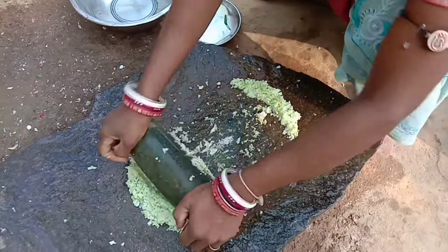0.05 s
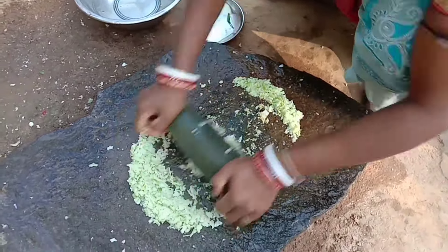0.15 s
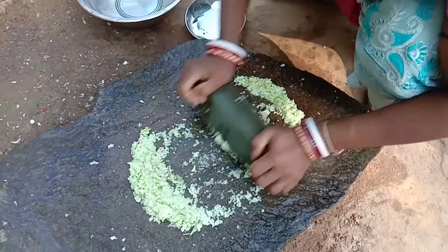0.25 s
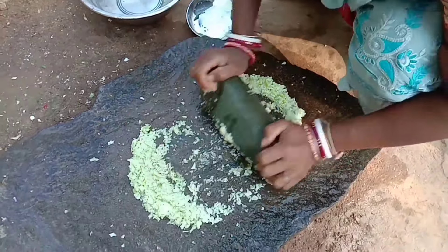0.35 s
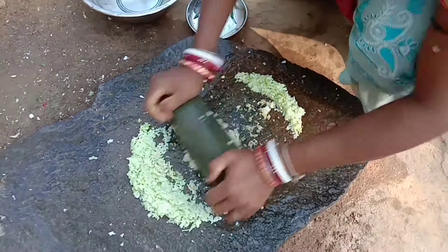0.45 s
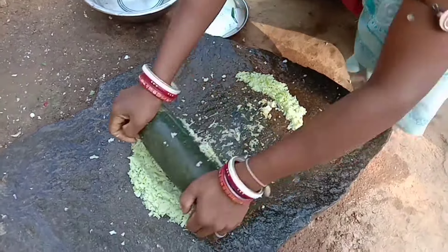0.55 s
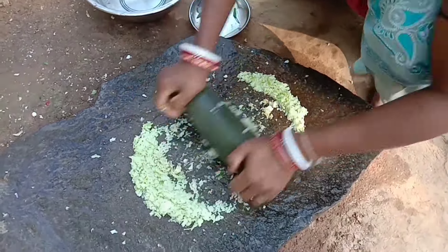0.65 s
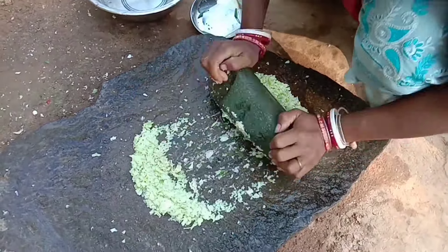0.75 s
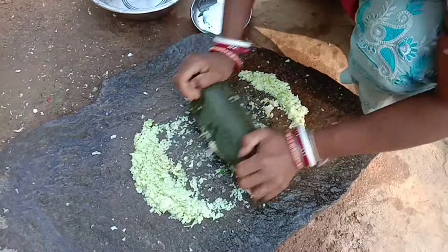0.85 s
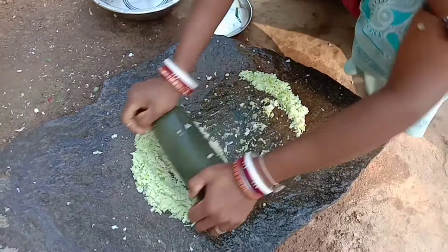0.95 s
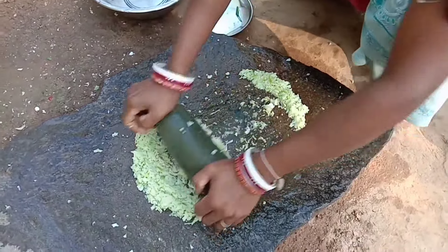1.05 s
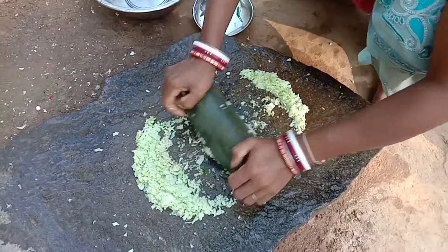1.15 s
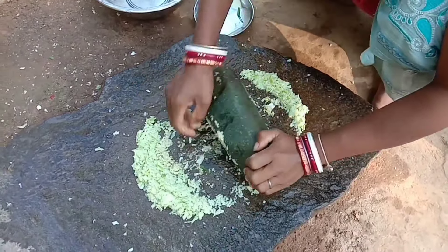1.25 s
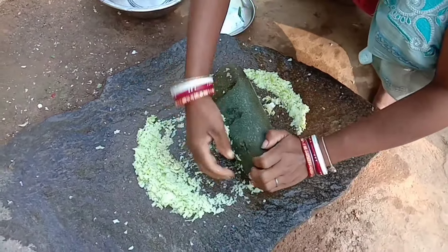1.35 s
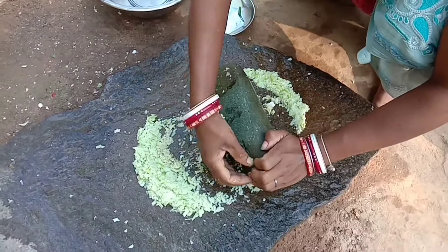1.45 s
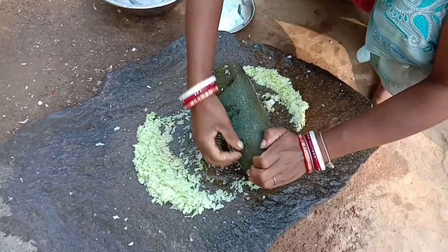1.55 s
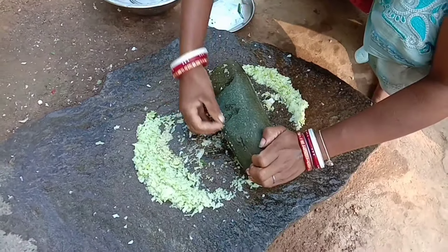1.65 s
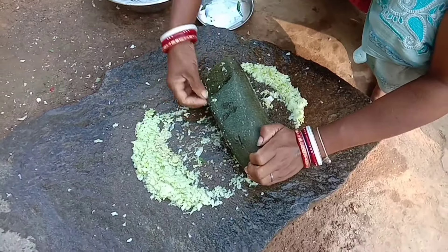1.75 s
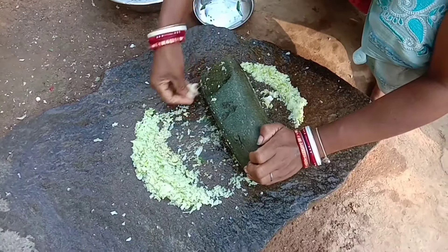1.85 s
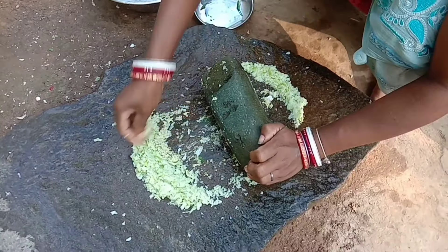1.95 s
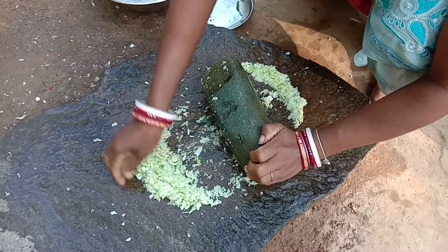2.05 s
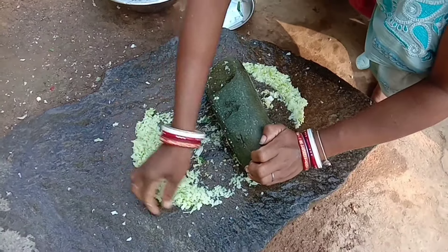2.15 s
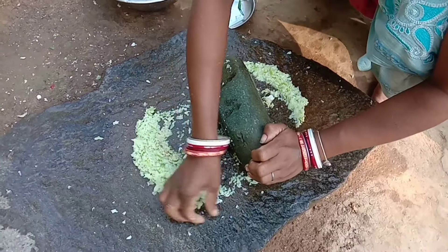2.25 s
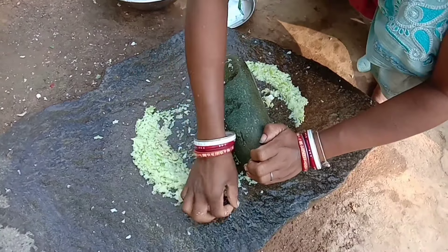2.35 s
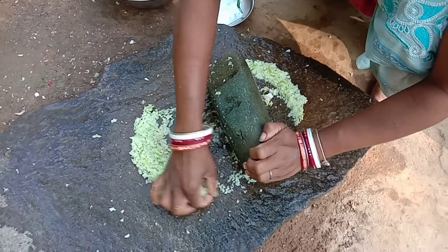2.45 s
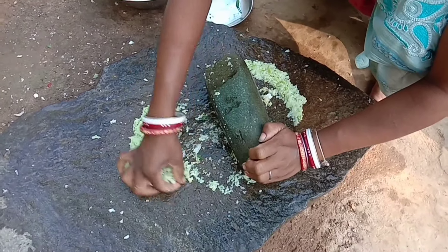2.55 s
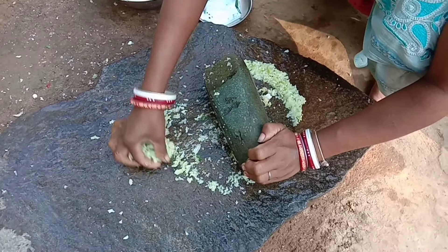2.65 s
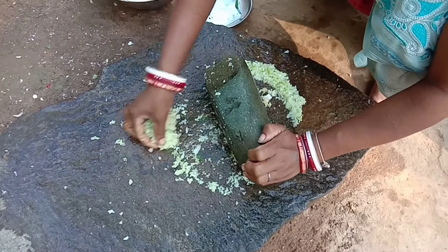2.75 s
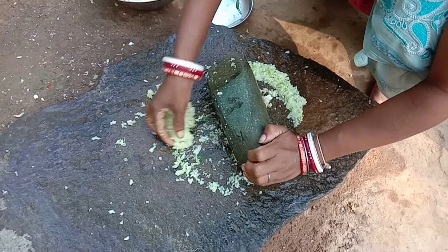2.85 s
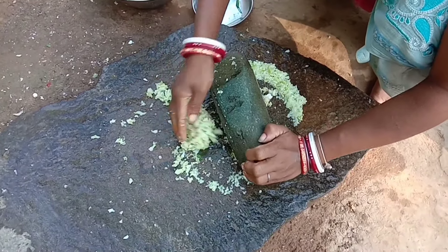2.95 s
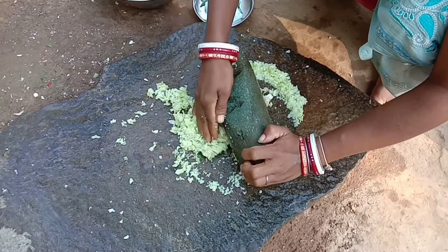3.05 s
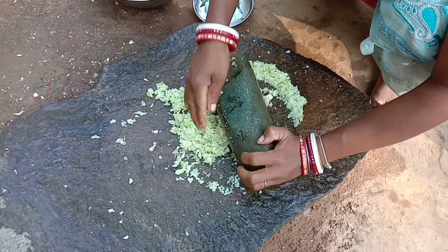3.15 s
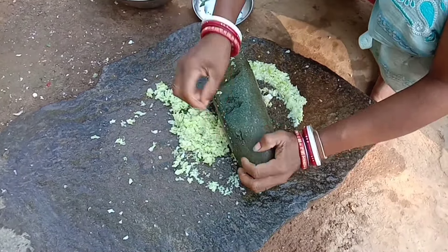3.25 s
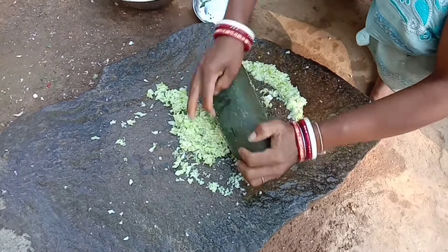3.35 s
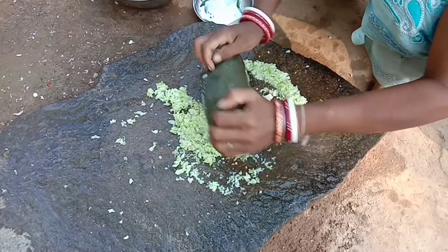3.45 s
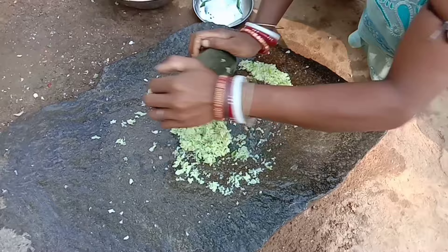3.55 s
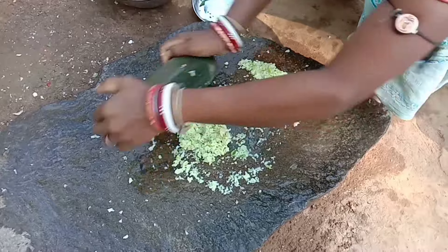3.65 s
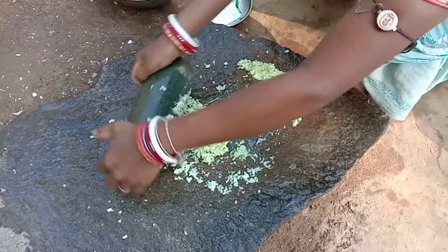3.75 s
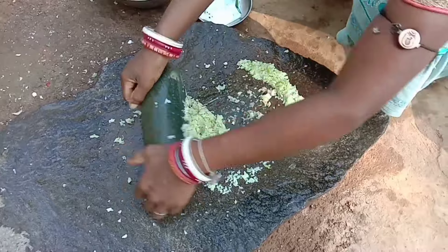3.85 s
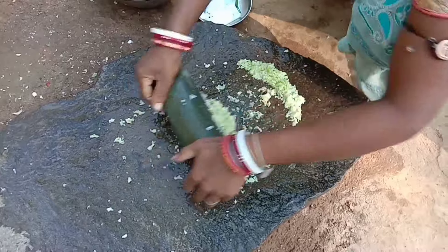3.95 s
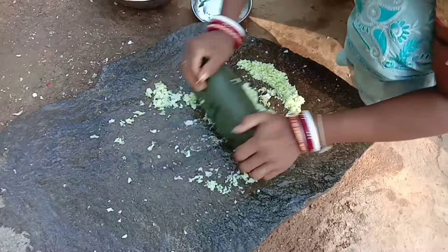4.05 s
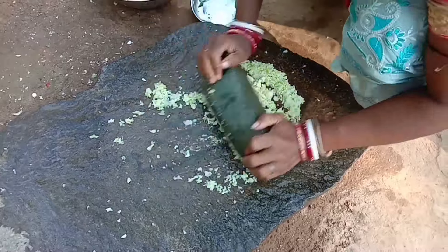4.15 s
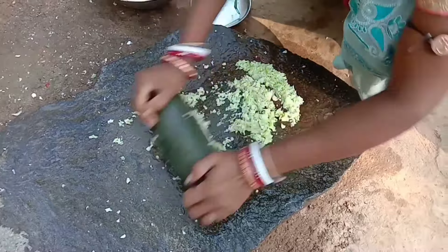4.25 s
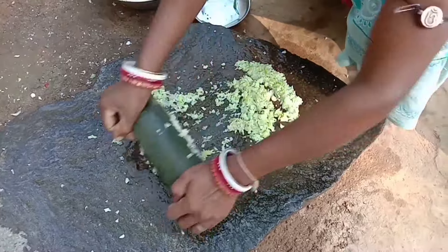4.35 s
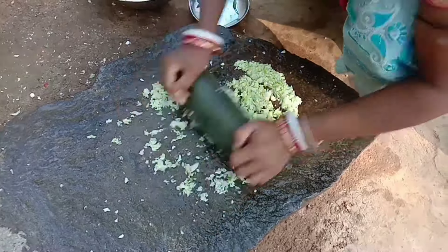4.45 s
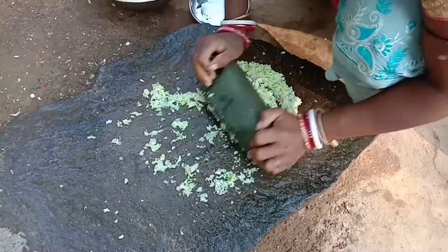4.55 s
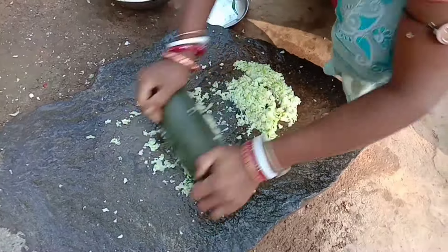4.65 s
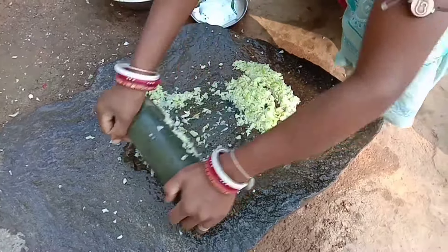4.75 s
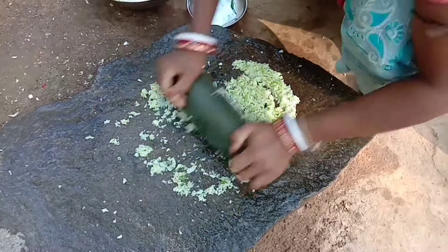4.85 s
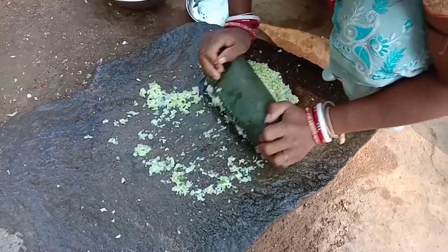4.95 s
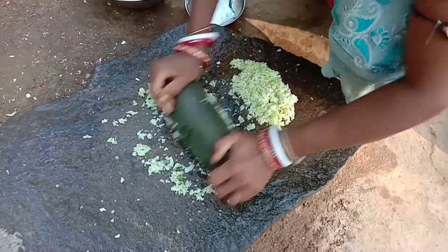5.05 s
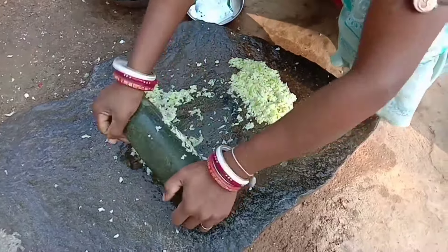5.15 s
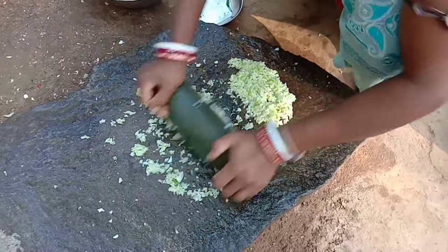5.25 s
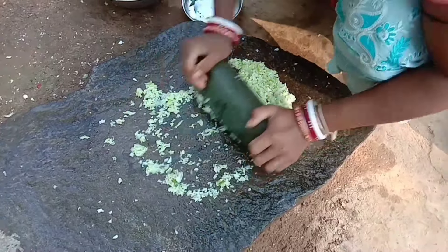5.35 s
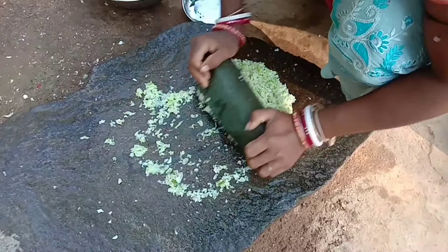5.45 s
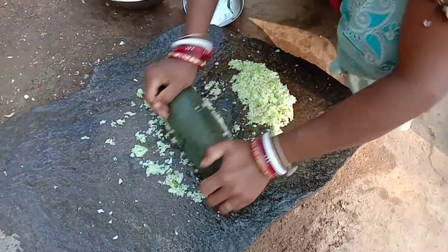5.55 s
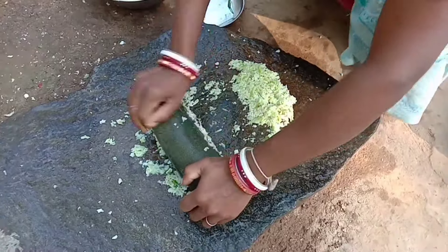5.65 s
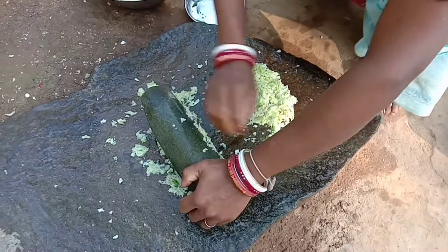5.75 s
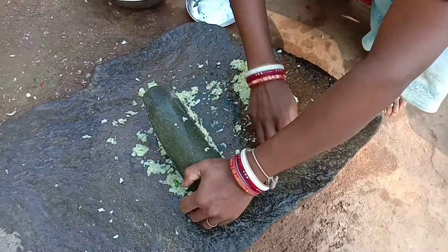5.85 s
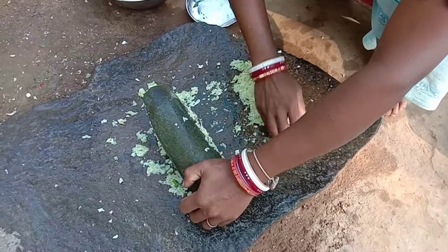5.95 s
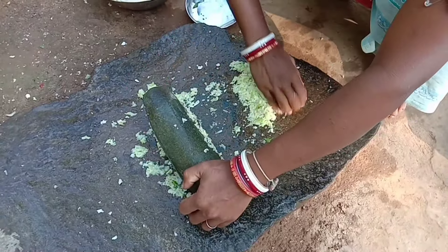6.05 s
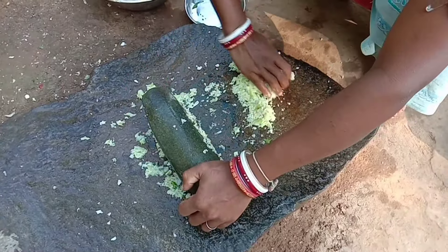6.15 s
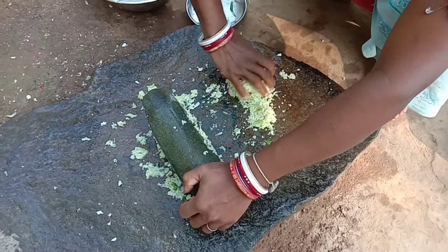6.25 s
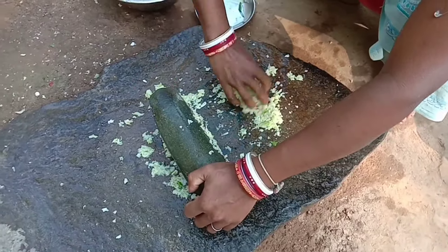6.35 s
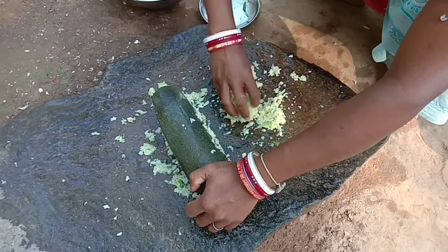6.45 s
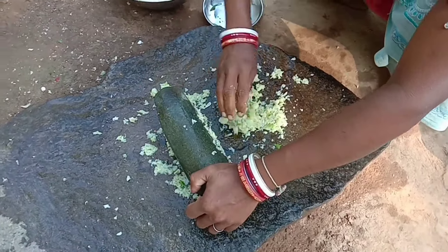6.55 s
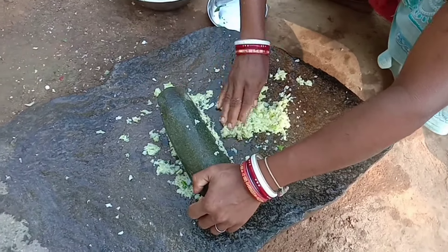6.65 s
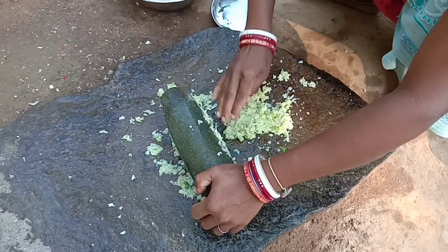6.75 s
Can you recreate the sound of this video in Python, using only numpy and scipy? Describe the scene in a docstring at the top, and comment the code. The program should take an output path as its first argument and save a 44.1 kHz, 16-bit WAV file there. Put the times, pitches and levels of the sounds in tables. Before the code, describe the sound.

A stone roller rumbles and scrapes wet shreds on a stone slab, bangles clinking, with a quieter hand-gathering pause and birdsong outdoors.

```python
"""Outdoors, beside a stone slab: from the start a stone roller rumbles, grit scrapes, wet pulp squishes, bangles clink.
From about 1.3 s the roller's strokes pause: a palm gathers the shreds, and birds whistle from the trees.
Between 3 and 4 s the roller is knocked down and goes back to work, now with less grit and more bursting bits.
From about 5.8 s the hand gathers again and birds call. One close phone microphone hears it all over the yard's hush.
Noise and random clicks, coloured or set ringing, make the work; sliding sines make the birds."""
import sys
import numpy as np
from scipy import signal
from scipy.fft import rfft, irfft, next_fast_len
from scipy.io import wavfile
from scipy.ndimage import uniform_filter1d

SR = 44100
rng = np.random.default_rng(int(sys.argv[2]) if len(sys.argv) > 2 else 0)


def inscribe(sig):
    """Save sig as 16-bit PCM at rate SR to the path in sys.argv[1].

    A 1-D sig is mono; a 2-D sig holds one channel per row.
    Samples are clipped to [-1, 1] before scaling.
    """
    pcm = np.round(np.clip(np.atleast_2d(sig).T, -1, 1) * 32767)
    wavfile.write(sys.argv[1], SR, pcm.astype(np.int16))


N = 299197

# Hush of the yard: (frequency [Hz], relative level per Hz [dB])
YARD_SPECTRUM = [(15, -32), (25, -18), (43, -14), (80, 2.5), (115, 7), (180, -1), (451, -14.5),
                 (1070, -18.5), (1260, -19), (1560, -20.5), (4370, -24), (5430, -24), (7920, -31.5),
                 (14800, -34), (16000, -29)]
YARD_DB = -45.5
# Part of the hush that differs between the channels: (frequency [Hz], relative level per Hz [dB])
SIDE_AIR_SPECTRUM = [(12, -72), (20, -42), (194, -21), (319, -23), (1050, -39), (1270, -61), (1730, -21),
                     (2690, -46), (15000, -52)]

# Roller strokes: (start [s], length [s], moment of hardest pressure [share of length],
# rumble [relative dB], grit [relative dB], pulp [relative dB], fizz [relative dB])
ROLLER_STROKES = [(-0.09, 0.27, 0, -18.5, -23, -29, -30.5), (0.171, 0.22, 0.26, -31, -33, -32, -36),
                  (0.378, 0.29, 0.11, -29, -29.5, -33, -37.5), (0.631, 0.2, .6, -37, -31, -31, -33.5),
                  (0.831, 0.26, 0.16, -41, -28, -31, -35), (1.07, 0.21, 0.5, -30.5, -35, -32.5, -37),
                  (3.609, 0.28, 0.19, -35, -37, -37, -42), (3.935, 0.32, 0, -59, -49.5, -40.5, -62),
                  (4.189, 0.33, 0.15, -43, -49, -35.5, -44.5), (4.421, 0.24, 0.3, -47, -50, -34, -46.5),
                  (4.621, 0.29, 0.12, -43, -47.5, -36, -38), (4.838, 0.19, 0.77, -38, -38.5, -31, -39),
                  (5.014, 0.3, 0.18, -36, -43, -34.5, -41), (5.271, 0.22, 0.52, -28.5, -41, -33.5, -39.5),
                  (5.443, 0.31, 0.28, -31.5, -39.5, -36, -43)]
STROKE_RISE_S, STROKE_FALL_S = 0.057, 0.11   # the roller gathers speed, then slows
PRESSURE_POWER = 1.86   # how closely grit and rumble gather round the hardest pressure
# Roller lurching over a lump or rocking at rest: (time [s], relative level [dB])
ROLLER_LURCHES = [(0.026, -13.5), (0.315, -18), (0.465, -29.5), (0.58, -33), (0.679, -21.5), (0.783, -28),
                  (0.982, -25), (1.255, -34), (1.41, -44), (1.7, -40), (2.01, -38.5), (2.085, -34.5),
                  (2.55, -39), (2.73, -47), (3.04, -43), (3.14, -54), (3.25, -38), (3.35, -39.5),
                  (3.65, -29), (3.695, -21.5), (4.297, -27.5), (4.471, -30), (4.545, -33), (4.707, -24),
                  (4.78, -30.5), (4.89, -21.5), (4.975, -28), (5.165, -28.5), (5.585, -30), (6.365, -44),
                  (6.44, -39), (6.53, -35)]
LURCH_S = 0.018   # standard deviation of a lurch's bell shape
# Spectra at the slab: (frequency [Hz], relative level per Hz [dB])
RUMBLE_SPECTRUM = [(25, -36), (50, -36), (75, -12), (100, 2.5), (125, 8.5), (160, 5.5), (200, -12),
                   (260, -16.5), (400, -64)]
GRIT_SPECTRUM = [(150, 7), (260, -0.5), (450, 3.5), (700, 6.5), (870, 6), (1040, 0.5), (1250, -5.5),
                 (1470, -4), (1850, 9.5), (2130, 1), (2450, 4), (3500, -36)]
PULP_SPECTRUM = [(600, -21), (1200, -13.5), (2400, -7), (3500, 0.5), (4700, -0.5), (5700, 3), (6600, 1.5),
                 (7300, -9.5), (8000, -13), (10000, -14.5), (16000, -81)]
FIZZ_SPECTRUM = [(6000, 1), (7200, 17), (8100, -20), (10000, 8.5), (11400, -35), (12500, -20), (15000, 8),
                 (16000, -3)]

# Roller knocking on the slab: (time [s], relative level [dB], contact hardness [Hz], relative ring level [dB])
ROLLER_KNOCKS = [(0.002, -12, 706, -8), (3.01, -26, 660, -2), (3.503, -16.5, 531, -5),
                 (3.55, -21, 485, -4.5), (3.635, -17.5, 610, 33), (3.670, -24.5, 720, 8),
                 (3.715, -1, 836, -10.5), (3.7371, -18, 640, 0), (3.8778, -2.5, 994, -4.5),
                 (3.8792, -9.5, 1710, 7), (3.8831, -8, 454, 0), (3.897, -6, 684, -18),
                 (5.586, -13, 338, -15), (5.598, -15.5, 310, -1.5), (6.364, -14.5, 250, -23)]
# Ringing modes of roller and slab: (frequency [Hz], relative level [dB], 60 dB decay time [s])
STONE_MODES = [(139.6, -7, 0.093), (250, -50, 0.026), (426, -1.5, 0.025), (525, -5, 0.036),
               (691, -8, 0.063), (738, -28, 0.03), (900, -6, 0.044), (1272, -3.5, 0.018),
               (1640, -33, 0.087), (1815, -4, 0.082), (2094, 0.5, 0.066)]

# Bangles touching: (time [s], relative level [dB], brightness [Hz], relative sparkle above 8 kHz [dB])
BANGLE_TOUCHES = [(0.0333, -7, 5500, -20), (0.075, 5.5, 13500, -18), (0.0828, 1, 5700, -6),
                  (0.113, -2.5, 6550, -16), (0.127, -0.5, 3480, -12.5), (0.139, -4, 5840, -20),
                  (0.174, -14.5, 5100, -25), (0.3379, -6, 3460, -11.5), (0.5214, 4, 5770, -15.5),
                  (0.556, -4.5, 5900, -14), (0.58, -4.5, 6400, -16.5), (0.617, -13, 6900, -16),
                  (0.7793, -8.5, 3370, -13.5), (0.7962, -8.5, 6450, -15), (0.889, -9.5, 6640, -10),
                  (0.973, -2, 13500, -13.5), (0.9951, -2, 6230, -19), (1.0146, -4.5, 8700, -10),
                  (1.0423, -7.5, 6540, -26), (1.065, -10.5, 6150, -18), (1.3546, -21, 4160, -27),
                  (1.4282, -8, 11700, -12.5), (1.45, -11.5, 5300, -19), (2.056, -19.5, 4720, -36),
                  (2.0754, -23.5, 4720, -31), (2.4229, -25.5, 7000, -20), (2.561, -18, 5000, -22),
                  (2.7418, -26, 15100, -19), (3.141, -27, 5700, -20), (3.3147, -5.5, 4710, -18.5),
                  (3.3656, -18, 4650, -21), (3.5745, -18, 3470, -18.5), (3.641, -11.5, 7250, -26),
                  (3.6696, -7.5, 7260, -21), (3.6887, -10, 9700, -10), (3.709, -6, 6700, -22),
                  (3.7427, -7.5, 7200, -24), (3.7825, -7.5, 7300, -17), (3.8087, -11.5, 7400, -22),
                  (3.934, -12, 6210, -22), (4.1361, -7.5, 9800, -9.5), (4.156, -10, 6300, -19),
                  (4.348, -6, 6100, -16.5), (4.3802, -2, 7300, -16), (4.4002, 0, 6600, -17.5),
                  (4.4315, -12, 6620, -19), (4.5775, -5.5, 6480, -18.5), (4.7586, -5.5, 6670, -15),
                  (4.78, 0.5, 4730, -15.5), (4.801, 0, 5700, -19), (4.8135, -6, 5500, -22),
                  (4.8797, -5.5, 5700, -18.5), (4.997, -12.5, 5170, -15), (5.117, -9.5, 6800, -15.5),
                  (5.1952, -0.5, 6800, -20), (5.2103, -0.5, 7280, -12), (5.217, -1.5, 7300, -18),
                  (5.242, -2, 7400, -18), (5.2594, -10.5, 5870, -21), (5.5423, -13.5, 6640, -15),
                  (5.6335, -3, 4700, -17.5), (5.6636, -16, 10300, -8), (5.696, -7.5, 11500, -10),
                  (5.717, -12.5, 7200, -21), (5.808, -20.5, 4550, -43), (5.891, -6, 6500, -13.5),
                  (6.339, -12.5, 5100, -23), (6.698, -15.5, 3730, -29)]
# Ringing modes of the bangles: (nominal frequency [Hz], relative level [dB], 60 dB decay time [s])
BANGLE_MODES = [(3460, -13, 0.067), (4040, -26, 0.15), (4720, -4, 0.015), (5300, 1, 0.0073),
                (5700, 2, 0.0078), (6480, 4.5, 0.0073), (6980, -0.5, 0.0045), (7260, -7, 0.053),
                (8820, -11, 0.025), (9926, -0.5, 0.0063), (11320, -12, 0.041), (13400, -37, .07),
                (13500, -6.5, 0.011), (14100, -27, .02), (15000, -25, .02)]
CHATTER_S = 0.0056   # decay of the bounces after a touch
JOSTLE_S = 0.013   # decay of the shaking that a touch gives the other bangles

# Bits of vegetable bursting: (time [s], relative level [dB], centre frequency [Hz])
PULP_BURSTS = [(1.1772, -17, 3740), (3.076, -20, 2800), (4.232, -17, 3600), (4.468, -15, 3600),
               (4.658, -14.5, 5130), (4.828, -9, 4720), (4.8733, -12, 4850), (4.9268, -14, 3460),
               (4.9673, -11.5, 5600), (4.974, -6.5, 4630), (5.1678, -11.5, 4400), (5.2943, -12, 4660),
               (5.3894, -7.5, 4570), (5.4147, -8.5, 5640), (5.517, -13, 5860), (5.5827, -8.5, 5980),
               (5.9783, -20.5, 3020), (5.996, -22, 2980)]

# Bird whistles: (start [s], end [s], first pitch [Hz], pitch neared at the end [Hz], relative level [dB])
BIRD_WHISTLES = [(1.25, 1.325, 3760, 3900, -53), (1.3, 1.455, 4110, 4290, -48),
                 (2.942, 3.02, 2160, 2100, -52), (3.049, 3.113, 1650, 1590, -38),
                 (3.177, 3.274, 1934, 1842, -41.5), (3.291, 3.489, 1500, 1333, -40.5),
                 (3.514, 3.57, 1790, 1723, -39), (3.587, 3.735, 2061, 1963, -28),
                 (3.741, 3.89, 2012, 1984, -45.5), (5.767, 5.9, 7900, 7700, -64),
                 (5.923, 6.075, 7390, 6700, -43), (6.176, 6.24, 3550, 3290, -49)]
BIRD_ECHO_DB, BIRD_FLUTTER_DB = -7.5, 1.2

# Hand sweeping the shreds: (start [s], length [s], palm rub [relative dB], rustle [relative dB],
# squelch [relative dB])
HAND_SWEEPS = [(1.29, 0.3, -71, -66, -52), (1.604, 0.11, -59, -50, -62), (1.723, 0.22, -59, -53.5, -51),
               (1.874, 0.18, -47.5, -83, -88), (2.166, 0.16, -46.5, -61.5, -56),
               (2.28, 0.19, -56, -52, -51.5), (2.488, 0.23, -46.5, -45, -40.5),
               (2.68, 0.31, -46.5, -54, -52.5), (2.861, 0.28, -40.5, -48.5, -51.5),
               (3.065, 0.064, -36, -38, -42), (3.088, 0.13, -42.5, -58, -49.5),
               (3.188, 0.51, -50, -56, -58.5), (5.865, 0.12, -51.5, -46, -39), (5.96, 0.059, -43, -38, -49),
               (5.977, 0.18, -39, -38.5, -54), (6.148, 0.11, -50, -52, -72), (6.228, 0.13, -39, -46, -78),
               (6.307, 0.18, -41.5, -44.5, -47), (6.449, 0.16, -56, -52.5, -51.5),
               (6.685, 0.047, -50, -34, -45)]
SWEEP_CREST, SWEEP_POWER = 0.35, 1.78   # fastest moment [share of length], sharpness of the swell
# Spectra of the gathering hand: (frequency [Hz], relative level per Hz [dB])
PALM_SPECTRUM = [(150, 0), (250, -4), (400, -3), (650, 0.5), (950, -12.5), (1250, -7), (2000, -42)]
RUSTLE_SPECTRUM = [(900, -6), (1300, -2.5), (2400, 1.5), (3400, 6), (4500, -6.5), (7000, -12)]
SQUELCH_SPECTRUM = [(2800, -69), (4500, 0.5), (5800, 2.5), (7000, 1), (8000, -17), (15000, 18)]

CUTOFF_HZ = 15700   # top of the microphone's band


def from_db(db):
    """Decibels to gain."""
    return np.exp(np.asarray(db) * np.log(10) / 20)


def rms_one(x):
    """Scale to rms 1."""
    return x / np.sqrt(np.mean(x ** 2) + 1e-20)


def add(out, start_s, sound):
    """Mix a sound in at its start time, trimming what falls outside the scene."""
    at = round(start_s * SR)
    part = sound[max(0, -at):max(0, N - at)]
    first = max(0, at)
    out[first:first + len(part)] += part


def colour(x, spectrum):
    """Weight a signal by a spectrum drawn over log frequency; rms 1."""
    hz, db = np.transpose(spectrum)
    size = next_fast_len(len(x), True)
    bins_hz = np.arange(size // 2 + 1) * SR / size + 1
    weight_db = np.interp(np.log(bins_hz), np.log(hz), db, left=-70, right=-70)
    return rms_one(irfft(rfft(x, size) * from_db(weight_db), size)[:len(x)])


def cut(x, hz, kind, order=2):
    """Butterworth filter."""
    return signal.sosfilt(signal.butter(order, hz, kind, fs=SR, output="sos"), x)


def ring(x, hz, t60):
    """A unit click sets a decaying sine of height about 1 ringing."""
    radius = from_db(-60 / (t60 * SR))
    angle = 2 * np.pi * hz / SR
    # the tiny offset keeps the filter clear of denormal numbers
    return signal.lfilter([0, np.sin(angle)], [1, -2 * radius * np.cos(angle), radius ** 2], x + 1e-18)


def ring_modes(clicks, modes):
    """Clicks excite every mode of a body, with alternating sign; rms 1."""
    total = 0
    for k, (hz, db, t60) in enumerate(modes):
        total = total + (-1) ** k * from_db(db) * ring(clicks, hz, t60)
    return rms_one(total)


def drift(rate):
    """Random wandering of rms 1, with a new target rate times a second."""
    return rms_one(np.interp(np.arange(N) * rate / SR, np.arange(8000), rng.standard_normal(8000)))


def grains(per_s, spread_db):
    """Random clicks of either sign, a few of them much larger than the rest."""
    out = np.zeros(N)
    born = np.flatnonzero(rng.random(N) < per_s / SR)
    size = rng.exponential(1, len(born))
    sign = rng.choice([-1, 1], len(born))
    out[born] = sign * from_db(spread_db * np.minimum(size, 5))
    return out


def crackle(per_s, spread_db, patchy_db, patch_rate, cycles=4, low_hz=1100, high_hz=9000, count=14):
    """Tiny bursts, each ringing a few cycles at its own pitch; the sizes that burst keep changing."""
    clicks = grains(per_s, spread_db)
    born = np.flatnonzero(clicks)
    pitch_of = rng.integers(0, count, len(born))
    out = 0
    for k, hz in enumerate(np.geomspace(low_hz, high_hz, count)):
        at = born[pitch_of == k]
        patch = np.interp(at * patch_rate / SR, np.arange(1000), rng.normal(0, 1.2, 1000))
        share = np.zeros(N)
        share[at] = clicks[at] * from_db(patchy_db * patch)
        out = out + np.sqrt(hz) * ring(share, hz, cycles / hz)
    return rms_one(out)


def slab_echo(x, strength, delay_s, swing, rate):
    """The slab reflects the sound a moment later; the path keeps changing, so its peaks wander."""
    at = np.arange(N)
    delay = delay_s * np.exp(swing * uniform_filter1d(drift(rate), size=4000))
    echo = np.interp(at - delay * SR, at, x)
    return (x + strength * echo) / np.hypot(1, strength)


def swell(length, crest, power):
    """One push of the arm: a half sine whose top lies at the share crest of its length."""
    progress = np.linspace(0, 1, round(length * SR), endpoint=False)
    phase = np.interp(progress, [0, np.clip(crest, .05, .95), 1], [0, .5, 1])
    return np.sin(np.pi * phase) ** power


def yard_hush():
    """Steady noise with the spectrum of the yard around the slab."""
    return from_db(YARD_DB) * colour(rng.standard_normal(N), YARD_SPECTRUM)


def stroke_levels(pulp_power=0.89, fizz_power=1.9):
    """Gains of rumble, grit, pulp and fizz: the first two follow the pressure, the others the roller's speed."""
    levels = np.zeros((4, N))
    for start, length, crest, *dbs in ROLLER_STROKES:
        pressure = swell(length, crest, PRESSURE_POWER)
        t = np.arange(len(pressure)) / SR
        speed = np.clip(np.minimum(t / STROKE_RISE_S, (t[-1] - t) / STROKE_FALL_S), 0, 1)
        shapes = (pressure, pressure, speed ** pulp_power, speed ** fizz_power)
        for level, db, shape in zip(levels, dbs, shapes):
            add(level, start, from_db(db) * shape)
    return levels


def lurch_level():
    """A bell-shaped swell of the rumble at each lurch."""
    level = np.zeros(N)
    t = np.arange(-SR // 4, SR // 4) / SR
    for time_s, db in ROLLER_LURCHES:
        add(level, time_s + t[0], from_db(db) * np.exp(-.5 * (t / LURCH_S) ** 2))
    return level


def rumble(stroke_level, lump_db=1.5, evenness=0.26):
    """The roller's weight rocks on the uneven slab: a low throb, partly evened out, swelling at each lurch."""
    throb = colour(rng.standard_normal(N), RUMBLE_SPECTRUM)
    strength = uniform_filter1d(np.abs(signal.hilbert(throb)), size=1300)
    level = np.hypot(stroke_level, lurch_level())
    return rms_one(throb / strength ** evenness) * level * from_db(lump_db * drift(30))


def grit_between_stones(ring_share=0.67):
    """Grit cracks between roller and slab and sets both ringing, over finer sandy crackle."""
    cracks = rms_one(grains(per_s=4900, spread_db=8.5))
    body = ring_modes(cracks, STONE_MODES)
    sand = crackle(per_s=6000, spread_db=2.0, patchy_db=3.5, patch_rate=35, cycles=6.0, low_hz=273, high_hz=2620)
    return colour(sand + ring_share * body, GRIT_SPECTRUM)


def wet_pulp(coarse_db=-6):
    """Wet pulp crackles finely while larger bits give way; the slab reflects both."""
    fine = colour(crackle(per_s=9000, spread_db=2.5, patchy_db=1.5, patch_rate=33), PULP_SPECTRUM)
    coarse = crackle(per_s=260, spread_db=3.0, patchy_db=-2.5, patch_rate=42,
                     cycles=12.4, low_hz=1500, high_hz=6700)
    pulp = 0.99 * fine + from_db(coarse_db) * cut(coarse, 6900, "low", order=8)
    return slab_echo(pulp, strength=0.6, delay_s=0.00069, swing=0.32, rate=9)


def shaken_level():
    """Each touch sets the other bangles on the wrist shaking; they soon settle."""
    level = np.zeros(N)
    t = np.arange(SR // 4) / SR
    for time_s, db, *_ in BANGLE_TOUCHES:
        add(level, time_s, from_db(db) * np.exp(-t / JOSTLE_S))
    return level


def scrape(grit_level, pulp_level, fizz_level, shaken_db=-29, fizz_gain_db=-2, judder_db=1.38, squish_db=0.3):
    """Grit and pulp under the moving roller; the same fine ticks make the fizz and jostle the bangles."""
    fizz_level = np.hypot(fizz_level, from_db(shaken_db) * shaken_level())
    ticks = grains(per_s=4400, spread_db=5.0)
    jostle = ring_modes(ticks, BANGLE_MODES)
    fizz = colour(ticks, FIZZ_SPECTRUM) * from_db(fizz_gain_db)
    wet = (wet_pulp() * pulp_level + fizz * fizz_level) * from_db(squish_db * drift(260))
    judder = from_db(judder_db * drift(76))   # the stone catches and slips
    return judder * (grit_between_stones() * grit_level + wet) + jostle * fizz_level


def knocks(scatter_db=-11, scatter_s=0.019, top_hz=2200, bottom_hz=100):
    """Stone meets stone through pulp: one push-pull pulse, a short dull ring and nearby reflections."""
    out = np.zeros(N)
    t = np.arange(8000) / SR
    click = t == 0
    for time_s, db, hard_hz, ring_db in ROLLER_KNOCKS:
        push = -ring(click, hard_hz, 5.2 / hard_hz)
        body = 0
        for hz, level, t60 in STONE_MODES:
            body = body + from_db(level) * rng.choice([-1, 1]) * ring(click, hz, t60)
        scatter = colour(rng.standard_normal(len(t)), GRIT_SPECTRUM) * np.exp(-t / scatter_s)
        tail = from_db(ring_db) * cut(body + from_db(scatter_db) * scatter, hard_hz, "low")
        dull = cut(push + tail, min(top_hz, 2 * hard_hz), "low", order=6)
        knock = cut(dull, bottom_hz, "high", order=3)
        add(out, time_s, from_db(db) * knock / np.abs(knock).max())
    return out


def bangle_rings(touches, db, bright_hz, vary_db=2.0, favour_db=5, purity=0.76, favour_width=0.093, detune=0.0022):
    """Slightly detuned modes of random strength; those near bright_hz are favoured, more so in soft touches."""
    rings = 0
    for hz, level, t60 in BANGLE_MODES:
        favour = (favour_db - purity * db) * np.exp(-(np.log(hz / bright_hz) / favour_width) ** 2)
        strength = from_db(level + favour + rng.normal(0, vary_db)) * rng.choice([-1, 1])
        rings = rings + strength * ring(touches, hz * (1 + detune * rng.standard_normal()), t60)
    return rms_one(rings)


def bangles(gain_db=8, tick_db=-4, chatter=0.53, top_db=11):
    """Bangles meet, chatter for a few milliseconds and ring; no two touches are quite alike."""
    out = np.zeros(N)
    t = np.arange(6000) / SR
    for time_s, db, bright_hz, sparkle_db in BANGLE_TOUCHES:
        bounces = rng.standard_normal(len(t)) * (rng.random(len(t)) < .25)
        touches = chatter * bounces * np.exp(-t / CHATTER_S)
        touches[0] = 1
        tick = cut(cut(touches, 3600, "high"), bright_hz, "low", order=1)
        clink = bangle_rings(touches, db, bright_hz) + from_db(tick_db) * rms_one(tick)
        # the top octave is balanced separately for each touch
        lower = rms_one(cut(clink, 7800, "low", order=10))
        sparkle = rms_one(cut(clink, 8200, "high", order=10))
        clink = lower + from_db(sparkle_db + top_db) * sparkle
        add(out, time_s, from_db(db + gain_db) * clink / np.linalg.norm(clink))
    return out


def crunches(gain_db=-9, fade_s=0.0032, spread=1.5):
    """A firm bit bursts in a short dry snap of noise around its own pitch."""
    out = np.zeros(N)
    t = np.arange(1024) / SR
    for time_s, db, centre_hz in PULP_BURSTS:
        burst = rng.standard_normal(len(t)) * np.exp(-t / fade_s)
        snap = cut(burst, [centre_hz / spread, centre_hz * spread], "band", order=3)
        onset_rms = np.sqrt(np.mean(snap[:64] ** 2))
        add(out, time_s, from_db(db + gain_db) * snap / onset_rms)
    return cut(out, 6700, "low", order=4)


def birds(settle=3.16, edge_s=0.021, waver=0.0081, echo_s=0.099, echo_top_hz=4500):
    """Sines that slide and settle on a pitch, with a duller trail scattered by trees and walls."""
    out = np.zeros(N)
    wobble = 1 + waver * drift(260)
    for start, end, first_hz, last_hz, db in BIRD_WHISTLES:
        t = np.arange(round((end - start) * SR)) / SR
        slide_hz = last_hz + (first_hz - last_hz) * np.exp(-settle * t / t[-1])
        hz = slide_hz * wobble[round(start * SR):][:len(t)]
        fade = np.clip(np.minimum(t, t[-1] - t) / edge_s, 0, 1)
        whistle = np.sqrt(2) * np.sin(2 * np.pi * np.cumsum(hz) / SR)
        add(out, start, from_db(db) * fade * whistle)
    song = out * from_db(BIRD_FLUTTER_DB * drift(60))
    t = np.arange(SR // 2) / SR
    trail = rng.standard_normal(len(t)) * np.exp(-t / echo_s) * (t > .008)
    echo = signal.fftconvolve(song, trail / np.linalg.norm(trail))[:N]
    return song + from_db(BIRD_ECHO_DB) * cut(echo, echo_top_hz, "low", order=1)


def sweep_levels(lingering_db=-17, lingering_s=0.28):
    """Gains of palm rub, rustle and squelch: one swell a sweep, with fainter stirring around each."""
    levels = np.zeros((3, N))
    for start, length, *dbs in HAND_SWEEPS:
        for level, db in zip(levels, dbs):
            add(level, start, from_db(db) * swell(length, SWEEP_CREST, SWEEP_POWER))
    return levels + from_db(lingering_db) * uniform_filter1d(levels, size=int(lingering_s * SR))


def gather(palm_db=-2, rustle_db=-1, squelch_db=-1, clump_db=3.0):
    """The hollow palm rubs the slab and sweeps the moist shreds together in clumps."""
    palm, rustle, squelch = sweep_levels()
    rub = crackle(per_s=6000, spread_db=2.5, patchy_db=7, patch_rate=16,
                  cycles=30, low_hz=173, high_hz=1330, count=12)
    shreds = crackle(per_s=10000, spread_db=0.0, patchy_db=5.0, patch_rate=27, cycles=54, count=22)
    shreds = shreds * from_db(clump_db * drift(55))
    sweeps = (palm * from_db(palm_db) * colour(rub, PALM_SPECTRUM)
              + rustle * from_db(rustle_db) * colour(shreds, RUSTLE_SPECTRUM)
              + squelch * from_db(squelch_db) * colour(shreds, SQUELCH_SPECTRUM))
    return slab_echo(sweeps, strength=0.53, delay_s=0.000613, swing=0.29, rate=5)


def scene(width_db=-32, air_db=-72):
    """Work at the slab, birds and the hush of the yard; both channels are nearly alike."""
    rumble_level, grit_level, pulp_level, fizz_level = stroke_levels()
    roller = rumble(rumble_level) + scrape(grit_level, pulp_level, fizz_level) + knocks()
    mid = yard_hush() + roller + bangles() + crunches() + birds() + gather()
    skewed = np.imag(signal.hilbert(mid, next_fast_len(N)))[:N]   # a slight phase difference between the channels
    air = from_db(air_db) * colour(rng.standard_normal(N), SIDE_AIR_SPECTRUM)
    side = from_db(width_db) * cut(skewed, 630, "high", order=1) + air
    return np.array([mid + side, mid - side])


def record(dry, case_hz=1255, case_q=15, case_gain=2.87):
    """The phone's case adds a narrow resonance; peaks overload and the top is cut."""
    resonance = signal.lfilter(*signal.iirpeak(case_hz, case_q, fs=SR), dry)
    overloaded = np.clip(dry + case_gain * resonance, -.95, .95)
    top_cut = signal.ellip(10, .2, 80, CUTOFF_HZ, fs=SR, output="sos")
    return signal.sosfilt(top_cut, overloaded)


dry = scene()
out = record(dry)
inscribe(out)
```